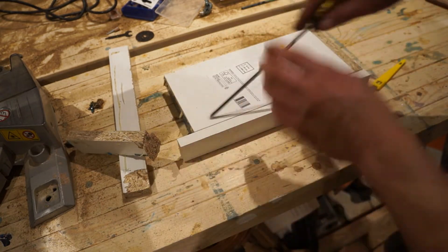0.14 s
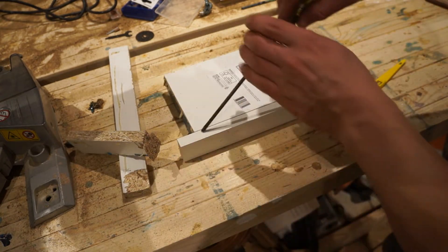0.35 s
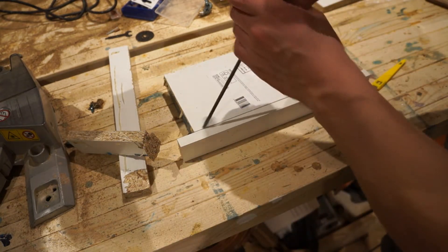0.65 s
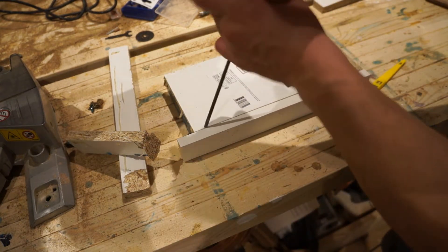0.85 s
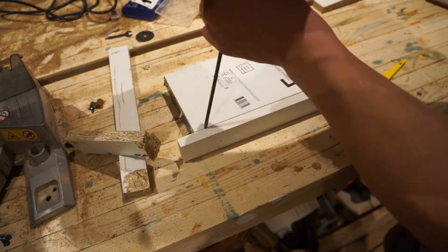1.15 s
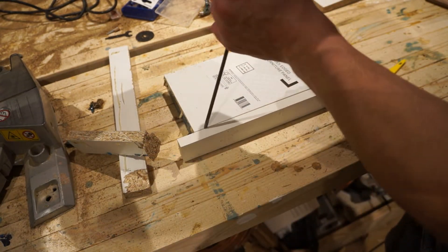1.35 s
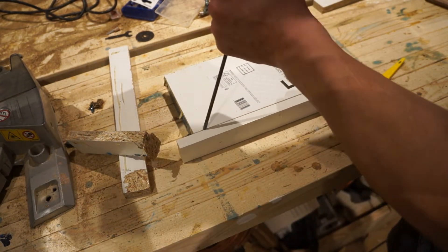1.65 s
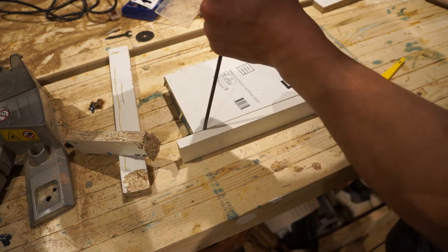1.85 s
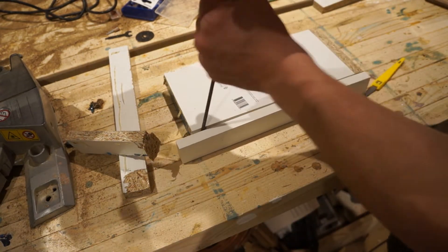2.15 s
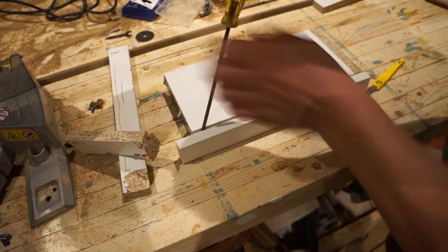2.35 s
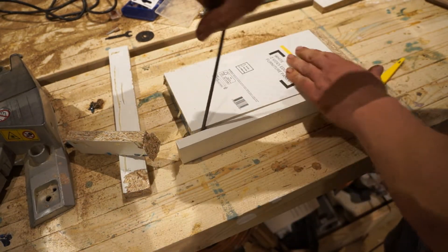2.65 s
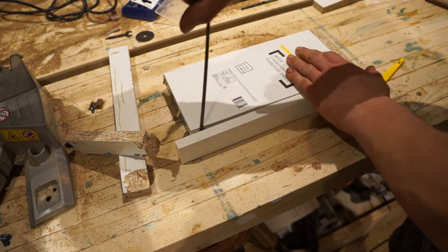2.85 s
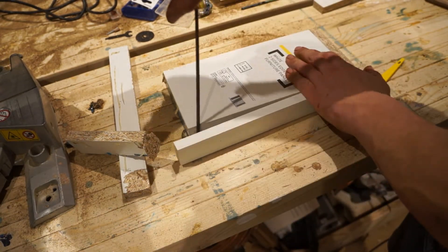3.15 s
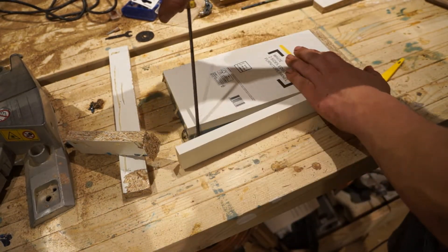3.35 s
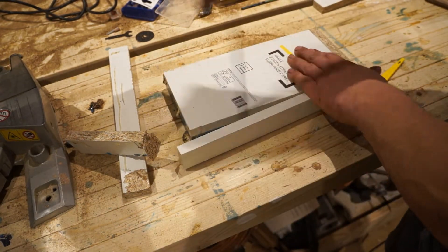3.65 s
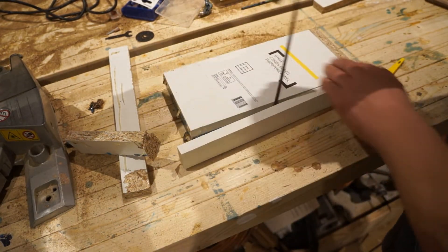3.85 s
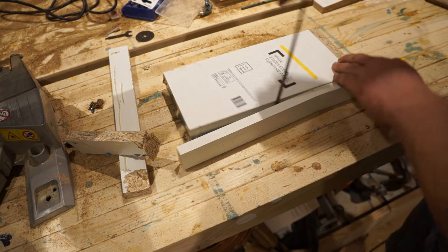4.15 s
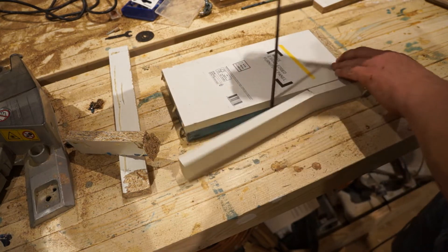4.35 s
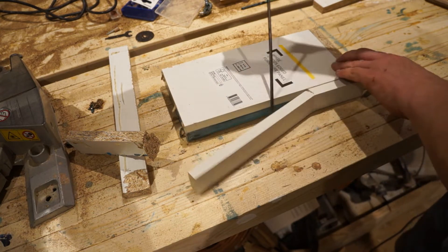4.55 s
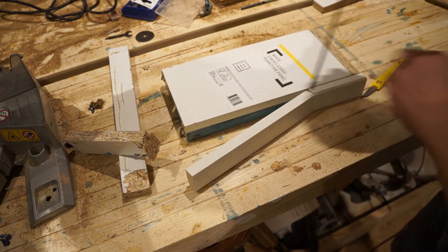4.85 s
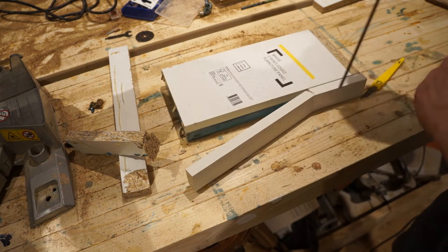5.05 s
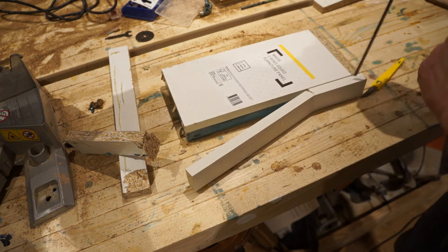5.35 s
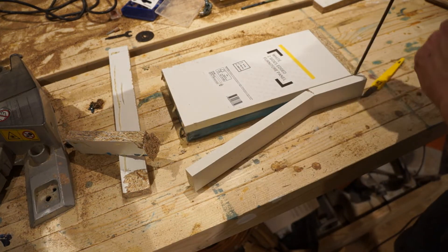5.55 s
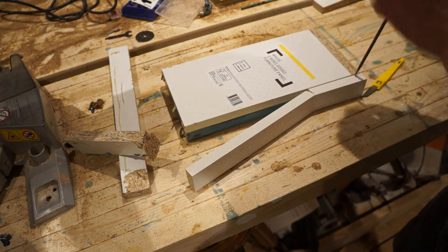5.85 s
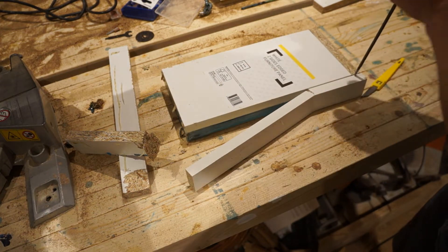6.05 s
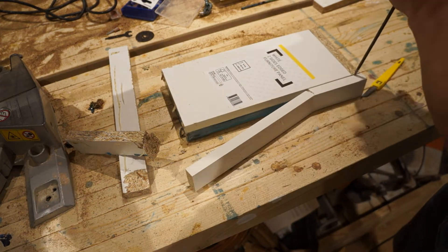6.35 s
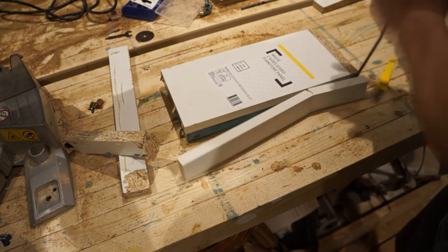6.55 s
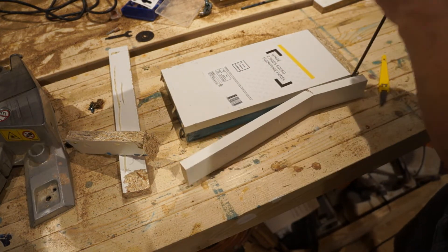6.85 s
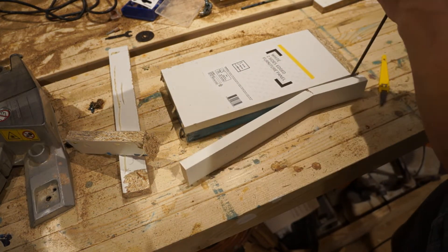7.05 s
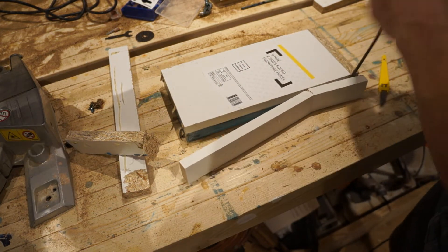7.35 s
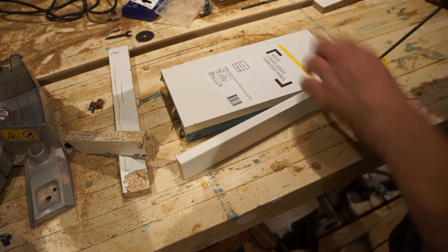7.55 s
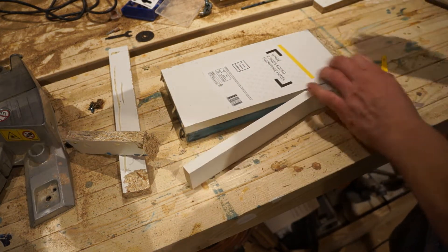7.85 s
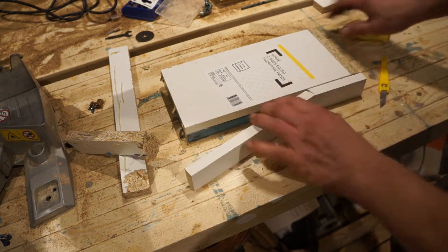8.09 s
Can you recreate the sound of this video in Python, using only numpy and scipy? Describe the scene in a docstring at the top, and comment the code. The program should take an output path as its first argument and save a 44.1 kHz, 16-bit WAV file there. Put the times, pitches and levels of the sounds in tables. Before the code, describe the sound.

Chipboard panels are pried off a block on a wooden bench: woody knocks, sharp joint cracks, heavy bangs, scraping, then a clattering landing.

```python
"""A thin steel rod pries chipboard panels off a cast block on a wooden bench in a small workshop.
Cracks, knocks and a few heavy blows combine noise bursts with dying modes of bench, board and rod.
Hands and panels rub in between as filtered noise; squeaks, creaks and landing panels add their tones.
Noise tails give the room its echo over a steady hush, and a camera close by holds the heavy blows
down with a limiter and a slow gain control."""
import sys
import numpy as np
from scipy import signal
from scipy.fft import rfft, irfft
from scipy.io import wavfile
from scipy.ndimage import uniform_filter1d, minimum_filter1d

SR = 44100
rng = np.random.default_rng(int(sys.argv[2]) if len(sys.argv) > 2 else 0)


def nominal_scale(level):
    """Amplitude ratio for a level in decibels (scalar or array-like)."""
    x = np.asarray(level, float) / 20
    return 10 ** x


def transcribe(u):
    """Save the signal u as a 16-bit wav file named by the first command-line argument.

    u: samples, shape (n,) or (channels, n), limited to [-1, 1]; the rate is SR.
    q: integer samples, one column per channel.
    """
    v = np.clip(np.atleast_2d(u).T, -1, 1)
    q = np.round(v * 32767).astype(np.int16)
    wavfile.write(sys.argv[1], SR, q)


N = 362502  # length of the scene in samples

# All event levels stand ahead of the echo and the gain control.
# Steady background spectrum. Each row: frequency in Hz, relative density in dB per Hz.
HUSH_SPECTRUM = [(15, -57), (25, 11), (163, 3.5), (252, 3.5), (466, -2), (739, -6), (1030, -8.5),
                 (1550, -9.5), (1860, -16), (10400, -21.5), (11500, -35), (15000, -75), (22000, -120)]
# Stereo background. Each row: frequency in Hz, left-right likeness from 0 to 1.
HUSH_LIKENESS = [(60, 1), (350, 0.6), (2010, 0.13), (11600, 0.93)]
# Decay of the room. Each row: frequency in Hz, t60 in seconds.
ROOM_T60 = [(100, 0.6), (260, 0.37), (700, 0.45), (1840, 0.41), (4850, 0.36), (11000, 0.21)]
# Stereo echo. Each row: frequency in Hz, left-right likeness from 0 to 1.
ROOM_LIKENESS = [(100, 1), (500, 0.9), (1500, 0.72), (5000, 0.64), (11000, 0.71)]
# Colour of the bench rumble. Each row: frequency in Hz, relative level in dB.
RUMBLE_COLOUR = [(10, 2.5), (25, -3.5), (45, -10), (110, -15.5), (250, -37.5)]

# Modes of the bench. Each row: frequency in Hz, relative level in dB, free t60 in seconds.
BENCH_MODES = [(125, -4.5, 0.1), (187.2, -0.5, 0.15), (228, -11.5, 0.1), (259, -1, 0.15), (309.6, -5, 0.16),
               (341, -9, 0.26), (389.4, 7.5, 0.11), (424, 6.5, 0.06), (480.7, 5, 0.13), (543, -3, 0.073),
               (597, -1, 0.078)]
# Modes of the rod. Each row: frequency in Hz, relative level in dB, free t60 in seconds.
ROD_MODES = [(1646, -5, 0.056), (1832, 6.5, 0.013), (2076, 10, 0.018), (2214, 3, 0.043), (2455, 2, 0.022),
             (2717, -0.5, 0.048), (2944, 2, 0.028), (3380, 2.5, 0.014), (3860, 2, 0.027), (5010, -1, 0.029),
             (6820, -4.5, 0.032)]
# Modes of a board. Each row: multiple of its pitch, relative level in dB, free t60 in seconds.
BOARD_MODES = [(0.858, -42, 0.049), (1, 12.5, 0.037), (1.07, -18, 0.049), (1.236, -16.5, 0.14)]
# Modes of a loose panel. Each row: frequency in Hz, relative level in dB, t60 in seconds.
LOOSE_MODES = [(483.5, 4, 0.12), (490, -21, 0.045), (843, -16, 0.098), (981, -5, 0.068),
               (1180, -3.5, 0.056), (1520, -18, .05), (1957, -4.5, 0.052), (2140, -12, 0.046)]
# Colour of a crack. Each row: frequency in Hz, relative level in dB.
CRACK_COLOUR = [(150, -48), (500, -7), (1000, 7), (2400, 10), (5000, 9), (8000, 4), (11000, -1)]
# Colour of the dense chipboard modes. Each row: frequency in Hz, relative level in dB.
CLACK_COLOUR = [(200, -6), (450, -0.5), (1200, 6.5), (2300, -5), (4000, -15.5), (9000, -31.5)]

# Rubbing. Each row is a stretch: panel against the drag in dB, extra top of the grit in dB, and a
# curve whose points hold: time in seconds, drag level in dB, grit level in dB.
RUB_STRETCHES = [ (-8, -9.5, [(0.0, -44, -51.5), (0.158, -51, -50.5), (0.45, -54.5, -55.5),
                 (0.7, -55, -55.5)]), (-12.5, 5, [(0.75, -56, -57.5), (1.086, -61.5, -60.5),
                 (1.274, -58, -63.5), (1.5, -78, -66.5)]), (4.5, -3.5, [(2.37, -72.5, -105),
                 (2.6, -66.5, -64), (2.75, -51.5, -53.5), (2.91, -72, -63)]), (0, -2, [(2.95, -68, -52),
                 (3.04, -45, -34), (3.15, -44, -32), (3.33, -51, -50), (3.43, -55, -53.5),
                 (3.6, -46, -52.5), (3.83, -58, -54), (3.92, -48.5, -46.5), (3.99, -56, -62)]),
                 (1, -1, [(4.03, -64, -60), (4.2, -54.5, -53.5), (4.38, -39.5, -32), (4.45, -56, -37),
                 (4.65, -54, -56), (4.8, -69, -55)]), (-2, -2.5, [(4.85, -79, -58.5), (5.0, -55, -64),
                 (5.4, -71, -68), (5.6, -52.5, -64.5), (5.97, -62.5, -59), (6.3, -66.5, -65),
                 (6.52, -56.5, -69)]), (-0.5, -10, [(6.9, -60, -67.5), (7.248, -69, -79),
                 (7.42, -52.5, -56.5), (7.732, -57, -55), (7.912, -55, -55.5), (8.02, -54.5, -78)]), ]
# Resonances of a rubbed panel. Each row: frequency in Hz, bandwidth in Hz, relative level in dB.
PANEL_RESONANCES = [(997, 92, -10), (1316, 210, 0), (1640, 500, -12)]
# Colour of the grit hiss. Each row: frequency in Hz, relative level in dB.
GRIT_COLOUR = [(1500, -10), (2300, 3.5), (3000, 1.5), (4000, 0), (4900, 0), (5900, -3), (7000, -1.5),
               (9000, 0.5), (11000, 0.5)]

# Panel and rod sliding on the block.
# Each row: start in seconds, length in seconds, level in dB, frequency in Hz, bandwidth in Hz.
SQUEAKS = [(2.547, 0.11, -55.5, 1392, 60), (2.54, 0.34, -57, 2023, 500), (3.598, 0.082, -51, 2300, 300),
           (3.728, 0.039, -45.5, 5170, 300), (3.88, 0.12, -48, 2380, 300), (3.886, 0.1, -57, 5250, 250),
           (3.882, 0.099, -61, 7000, 300), (4.76, 0.079, -46, 1340, 90), (4.762, 0.041, -41, 1892, 400),
           (5.495, 0.57, -58, 1382, 45), (7.38, 0.11, -64, 4840, 350), (7.573, 0.071, -43.5, 4900, 450)]
# Stick-slip creaks. Each row: start in seconds, peak in dB, frequency in Hz, length in seconds.
STICK_SLIPS = [(2.87, -47.5, 493, 0.06), (4.606, -41, 1786, 0.029), (4.635, -36, 482, 0.034),
               (4.675, -41, 479, 0.018), (4.71, -40.5, 460, 0.021), (4.79, -40.5, 542, 0.052),
               (5.116, -41, 370, 0.045), (5.172, -41.5, 386, 0.038)]
# Crowded small snaps of a splitting joint.
# Each row: start in seconds, length in seconds, level at the start in dB.
SPLIT_JOINTS = [(3.02, 0.2, -34), (4.22, 0.29, -45)]
# The rod clear of the wood. Each row: start in seconds, level in dB, frequency in Hz, t60 in seconds.
FREE_ROD = [(0.5018, -34.5, 2183, 0.027), (1.4885, -50, 2900, .007), (1.49, -55, 1800, .03),
            (1.5062, -45, 3620, .006), (2.7547, -41, 2850, 0.056), (3.036, -34, 2130, 0.09),
            (3.63, -46, 2935, 0.1), (3.7334, -43.5, 2886, 0.054), (4.141, -48.5, 2320, 0.01),
            (7.6, -40, 1775, 0.12), (7.605, -36.5, 2245, 0.14), (7.62, -49, 2900, .08),
            (7.62, -48, 3470, .1), (7.62, -39, 2495, 0.17), (7.815, -53, 2960, 0.056),
            (7.855, -53, 2280, 0.09)]
# A loose panel lands on the bench. Each row: start in seconds, level in dB.
LANDINGS = [(8.0183, -19), (8.096, -12), (8.17, -14.5)]
# Short scrapes. Each row: start in seconds, then in dB, ahead of the smearing: crack peak, board, bench.
SHORT_SCRAPES = [(0.488, -30, -37, -46), (0.78, -45.5, -61, -59), (2.62, -42.5, -74, -52),
                 (5.022, -58, -51, -43.5), (3.99, -54, -50, -35.5), (5.474, -39, -35, -42),
                 (7.577, -33.5, -34.5, -63), (7.588, -36, -28.5, -53), (7.597, -34, -34, -68),
                 (7.611, -27, -30.5, -45.5), (7.64, -39, -33, -46), (7.688, -43, -45, -70),
                 (7.811, -39.5, -45.5, -48.5)]
# The rod or a hand knocks a board.
# Each row: start in seconds, board level in dB, board pitch in Hz, bench level in dB, crack peak in dB.
BOARD_KNOCKS = [(0.1791, -24.5, 953, -39.5, -23), (0.2181, -22, 934, -33, -20.5),
                (0.3022, -23, 940, -35, -31.5), (0.5017, -22.5, 972, -37, -23.5),
                (0.6953, -39.5, 920, -48, -50.5), (3.2129, -42.5, 990, -42, -21),
                (3.6269, -45.5, 994, -38, -26), (3.733, -40.5, 963, -45, -23),
                (3.789, -46, 1120, -47, -32.5), (3.9633, -44, 1070, -27.5, -40),
                (4.1368, -49, 857, -43, -53), (4.765, -36.5, 943, -51, -27.5),
                (5.4221, -31, 1047, -27, -33), (6.208, -37, 1063, -34, -37.5),
                (6.8826, -44, 1010, -55, -50), (8.018, -26, 1021, -30.5, -37),
                (8.0961, -9.5, 960, -22.5, -7.5)]
# The joint of panel and block cracks open. Each row: start in seconds, crack peak in dB, bench in dB.
JOINT_CRACKS = [(1.1103, -41.5, -58), (1.486, -33, -67), (1.506, -32, -59), (1.525, 3, -24),
                (1.9762, 5, -28), (2.7287, -28, -74), (2.755, -17.5, -60), (2.923, -41, -52),
                (2.9314, -35, -58), (2.9632, -21, -62), (2.9838, -30, -50), (2.9995, -30, -53),
                (3.0133, -16, -42.5), (3.036, -7, -30), (3.0574, -11.5, -41.5), (3.0778, -14, -42),
                (3.1022, -4, -39), (3.149, -17, -49), (3.2342, -25, -48), (3.3169, -24, -53),
                (3.3392, -20.5, -48.5), (3.4385, -32, -45), (3.4962, -27, -54), (4.2108, -21.5, -45),
                (4.2329, -17.5, -61), (4.2727, -24, -60), (4.2769, -15.5, -60), (4.286, -16.5, -52),
                (4.3168, -27, -66), (4.3456, -15.5, -43), (4.354, -18.5, -46), (4.365, -25, -38),
                (4.393, -24, -40.5), (4.435, -14, -44), (4.4432, -26, -53), (4.5162, -17.5, -64),
                (5.8392, -29, -47), (6.5325, 6.5, -32), (6.5375, 0.5, -30), (7.0554, -42.5, -69),
                (8.108, -5, -28)]
# Heavy blows. Each row: start in seconds, levels of the separate parts in dB (crack peak, bench, board),
# tilt of the bench modes in dB per octave, shake of the bench in dB.
HEAVY_BLOWS = [(1.519, -2, -2, -19.5, -5, -21), (1.971, 10.5, -2, -3, -3.5, -17.5),
               (6.526, 5.5, -3.5, -2, 2, -21), (8.103, 2, -11.5, -7.5, 20, -43)]


def evened(x):
    """Normalisation: scales a signal to rms 1."""
    return x / np.sqrt(np.mean(x ** 2) + 1e-20)


def read(points, hz):
    """Interpolates a response table linearly along a log-frequency axis."""
    f, value = np.transpose(points)
    return np.interp(np.log(hz + 1), np.log(f + 1), value)


def coloured(x, points):
    """Linear filtering: weights the spectrum by a response in dB."""
    gain = nominal_scale(read(points, np.fft.rfftfreq(len(x), 1 / SR)))
    return irfft(rfft(x) * gain, len(x))


def add(mix, s, sound):
    """Superposition: adds a sound to the mix from second s."""
    part = mix[round(s * SR):][:len(sound)]
    part += sound[:len(part)]


def noise_pair(gain, same):
    """Partly coherent stereo noise: a shared and an opposed field, shaped over frequency and time."""
    hz, t = np.fft.rfftfreq(512, 1 / SR)[:, None], np.arange(N // 128 + 5) * 128 / SR
    a, b, c, d = rng.standard_normal((len(t), len(hz), 4)).T
    like = np.clip(read(same, hz), 0, 1)
    shared = (a + 1j * b) * np.sqrt(1 + like)
    apart = (c + 1j * d) * np.sqrt(1 - like)
    z = np.array([shared + apart, shared - apart]) * gain(hz, t)
    return signal.istft(z, nperseg=512, noverlap=384)[1][:, :N]


def burst(size, rise_s, points, even):
    """A noise impulse; even = 1 flattens its chance spectrum before colouring, 0 leaves it lumpy."""
    t = np.arange(size) / SR
    z = rfft(rng.standard_normal(size) * (t / rise_s) ** 2 * np.exp(-t / rise_s))
    colour = nominal_scale(read(points, np.fft.rfftfreq(size, 1 / SR)))
    z *= colour / (abs(z) + 1e-9) ** np.clip(even, 0, 1)
    return irfft(z, size) * signal.windows.tukey(size, .02)


def ring(modes, spread_db, rise_s, size=8000):
    """Modal decay: dying sines, excited unequally by chance; rms 1 over the first 20 ms."""
    t = np.arange(size) / SR
    hz, db, t60 = np.transpose(modes)[:, :, None]
    luck_db = spread_db * rng.standard_normal(db.shape)
    side = (-1.) ** np.arange(len(db))[:, None]  # neighbours of opposite sign fill the gaps between them
    rise = (1 - np.exp(-t / rise_s)) ** 2  # the contact builds up
    level = nominal_scale(db + luck_db - 60 * t / t60)
    x = rise * (side * level * np.sin(2 * np.pi * hz * t)).sum(0)
    return x / np.sqrt(np.mean(x[:SR // 50] ** 2))


def clack(hold, size=8000):
    """High modal density: chipboard modes too close to tell apart act as fast-dying coloured noise."""
    t60 = 0.079 * hold
    t = np.arange(size) / SR
    x = coloured(rng.standard_normal(size), CLACK_COLOUR)
    x = x * (1 - np.exp(-t / 0.00098)) * nominal_scale(-60 * t / t60)
    return x / np.sqrt(np.mean(x[:SR // 50] ** 2))


def hush():
    """Stationary noise: the steady air of the workshop and the hiss of the microphone."""
    noise = noise_pair(lambda hz, t: nominal_scale(read(HUSH_SPECTRUM, hz)), HUSH_LIKENESS)
    return nominal_scale(-56.5) * evened(noise)


def rooms(count=4):
    """Reverberation: noise tails for several places on the bench decay at a rate set by frequency."""
    size = 30000
    noise = noise_pair(lambda hz, t: 1, ROOM_LIKENESS)[:, :count * size].reshape(2, count, size)
    hz, t, z = signal.stft(noise, SR, nperseg=256)
    decay = nominal_scale(-60 * t / read(ROOM_T60, hz)[:, None])
    tails = signal.istft(z * decay, SR, nperseg=256)[1][..., :size]
    tails = tails * np.clip((np.arange(size) / SR - .002) / 0.0015, 0, 1)  # walls answer after a few ms
    return tails / np.linalg.norm(tails[0], axis=-1)[:, None]  # energy 1 on the left


def shake():
    """Structural vibration: after a heavy blow the bench rumbles as low noise that dies exponentially."""
    t60 = 0.53  # s
    t, level = np.arange(N) / SR, np.zeros(N)
    for s, *_, db in HEAVY_BLOWS:
        rise = np.clip((t - s) / .012, 0, 1) ** 2
        level += rise * nominal_scale(db - 60 * np.maximum(t - s, 0) / t60)
    shared, apart = (coloured(x, RUMBLE_COLOUR) for x in rng.standard_normal((2, N)))
    return level * evened(np.array([shared + 0.098 * apart, shared - 0.17 * apart]))


def rubbing():
    """Friction: dense uneven grains excite bench and panel resonances and a fine grit hiss."""
    rows = [(s, drag, drag + panel, grit, top)
            for panel, top, curve in RUB_STRETCHES for s, drag, grit in curve]
    s, *columns = np.transpose(rows)
    bench_db, panel_db, grit_db, fine_db = (np.interp(np.arange(N) / SR, s, c) for c in columns)

    # grain level changes by chance every 64 samples
    size_db = np.array([[2.35], [2.35], [4.0]]) * np.minimum(rng.exponential(1, (3, N // 64 + 1)), 3)
    grains = rng.standard_normal((3, N)) * nominal_scale(size_db.repeat(64, axis=1)[:, :N])

    t = np.arange(4000) / SR
    panel = sum(nominal_scale(db) * width * np.exp(-np.pi * width * t) * np.sin(2 * np.pi * hz * t)
                for hz, width, db in PANEL_RESONANCES)
    drag = signal.oaconvolve(grains[0], ring(BENCH_MODES, spread_db=1.0, rise_s=0.00053))[:N]
    slide = signal.oaconvolve(grains[1], panel)[:N]
    grit = evened(coloured(grains[2], [(700, -50), *GRIT_COLOUR]))
    fine = coloured(grit, [(5000, -28), (8000, -0.5)])
    grit = grit + (nominal_scale(fine_db) - 1) * fine  # dry skin and dust change only the top
    return nominal_scale(bench_db) * evened(drag) + nominal_scale(panel_db) * evened(slide) + nominal_scale(grit_db) * grit


def squeak(length, db, hz, width_hz):
    """Narrow-band friction noise: slow complex noise modulates a tone into a fuzzy whistle."""
    t = np.arange(0, length, 1 / SR)
    r = np.exp(-np.pi * width_hz / SR)
    noise = rng.standard_normal((len(t), 2)).T
    a, b = signal.lfilter([(1 - r) ** 2], np.poly([r, r]), noise)
    turn = 2 * np.pi * hz * t
    whistle = evened(a * np.cos(turn) + b * np.sin(turn))
    return nominal_scale(db) * whistle * np.sin(np.pi * (t / length) ** 0.64)


def creak(db, hz, length):
    """Stick-slip: one mode sings briefly, here a sine that swells and fades."""
    t = np.arange(0, length, 1 / SR)
    return nominal_scale(db) * np.sin(2 * np.pi * hz * t) * np.hanning(len(t))


def snaps():
    """Random impulses: fibres let go, a few loudly; each split starts at once and falls by 12 dB."""
    snaps_per_s = 160
    t = np.arange(N) / SR
    clicks = (rng.random(N) < snaps_per_s / SR) * nominal_scale(4.5 * np.minimum(rng.exponential(1, N), 3))
    kind = rng.integers(0, 8, N)  # eight different bursts
    train = sum(signal.oaconvolve(clicks * (kind == k), burst(256, 0.00059, CRACK_COLOUR, 0.2))[:N]
                for k in range(8))
    level = sum((t > s) * (t < s + length) * nominal_scale(db - 12 * (t - s).clip(0, 1) / length)
                for s, length, db in SPLIT_JOINTS)
    return level * evened(train)


def free_rod(db, hz, t60):
    """Light damping: clear of the wood, the rod rings on in a close pair of tones."""
    pair = [(hz, 0, t60), (hz * 1.02, -7, t60)]
    return nominal_scale(db) * ring(pair, spread_db=1, rise_s=0.001)


def landing(db):
    """Impact of a loose panel: its separate modes ring over the dense chipboard clack."""
    return nominal_scale(db) * (ring(LOOSE_MODES, spread_db=6.5, rise_s=0.00074) + nominal_scale(-8) * clack(hold=0.86))


def parts(crack_db, bench_db, board_db, rod_db, board_hz, tilt_db=0, hold=1, even=0.078, luck=1):
    """Impact excitation: a short crack sets bench, board and rod ringing; hold under 1 damps them."""
    bench = [(hz, db + tilt_db * np.log2(hz / 300), t60 * hold) for hz, db, t60 in BENCH_MODES]
    board = [(k * board_hz, db, t60 * hold) for k, db, t60 in BOARD_MODES]
    rod = [(hz, db, t60 * hold) for hz, db, t60 in ROD_MODES]
    low = nominal_scale(bench_db) * ring(bench, spread_db=3.8 * luck, rise_s=0.00019)
    middle = nominal_scale(board_db) * ring(board, spread_db=3 * luck, rise_s=0.0025)
    high = nominal_scale(rod_db) * ring(rod[:-3], spread_db=3 * luck, rise_s=0.0001)
    # the top three rod modes follow the crack
    top = nominal_scale(crack_db - 26.5) * ring(rod[-3:], spread_db=3 * luck, rise_s=0.0001)
    body = nominal_scale((bench_db + board_db) / 2 - 10.5) * clack(hold)
    puff = burst(512, 0.00038, CRACK_COLOUR, even)
    crack = np.pad(nominal_scale(crack_db) * puff / abs(puff).max(), (0, len(low) - len(puff)))
    highpass = signal.butter(2, 95, "high", fs=SR, output="sos")
    return signal.sosfilt(highpass, [crack, low, middle, high, top, body])


def hit(*levels, hold=1):
    """Superposition at a single contact: all parts start together."""
    return parts(*levels, hold=hold).sum(0)


def smeared(sound, rise_s):
    """Convolution with a noise burst spreads a hit in time, like a quick train of contacts."""
    rattle = burst(2048, rise_s, [(20, 0), (20000, 0.0075)], 0.66)
    return signal.fftconvolve(sound, rattle / np.linalg.norm(rattle))


def scrape(crack, board, bench):
    """Repeated contact: a hit smeared over a few milliseconds has a softer start."""
    return smeared(hit(crack, bench, board, crack - 12.5, 1007), rise_s=0.0029)


def knock(board, hz, bench, crack):
    """Free impact: the struck board rings at its own pitch, the rod 14 dB under the crack."""
    return hit(crack, bench, board, crack - 14, hz)


def joint_crack(crack, bench):
    """Sudden release: the joint opens with a sharp crack, and boards held in place ring short."""
    return hit(crack, bench, crack - 35.5, crack - 17, 934, hold=0.54)


def blow(crack, bench, board, tilt_db):
    """Damped incoherent impact: pressed parts ring short, and their powers add up to a dense bang."""
    levels = (crack, bench, board, (crack + board) / 2 - 10.5, 1000)
    struck = parts(*levels, tilt_db=tilt_db, hold=0.21, even=1.0, luck=0.1)
    power = (abs(rfft(struck)) ** 2).sum(0)
    treble = np.clip(np.fft.rfftfreq(8000, 1 / SR) / 1300 - 1, 0, 1)  # the high modes melt together
    narrow = uniform_filter1d(power, size=25)
    wide = uniform_filter1d(power, size=161)
    blurred = np.sqrt(abs((1 - treble) * narrow + treble * wide))
    rattle = rfft(burst(2048, 0.00234, [(20, 0), (20000, 0)], 0.92), 8000)
    bang = irfft(blurred * rattle / np.sqrt(np.mean(abs(rattle) ** 2)))
    bang = np.roll(bang, shift=60)[:4000]
    rise_s = 0.0059  # the parts give a little first
    bang = bang * (1 - np.exp(-(np.arange(len(bang)) / SR / rise_s) ** 2))
    highpass = signal.butter(2, 150, "high", fs=SR, output="sos")  # the bench radiates little bass
    return signal.sosfilt(highpass, bang)


def scene():
    """Direct and reverberant fields: events, rubbing and snaps also sound through the echo tails."""
    sounds = [(s, blow(*levels, tilt_db)) for s, *levels, tilt_db, _ in HEAVY_BLOWS]
    sounds += [(s, knock(*row)) for s, *row in BOARD_KNOCKS]
    sounds += [(s, joint_crack(*row)) for s, *row in JOINT_CRACKS]
    sounds += [(s, scrape(*row)) for s, *row in SHORT_SCRAPES]
    sounds += [(s, creak(*row)) for s, *row in STICK_SLIPS]
    sounds += [(s, squeak(*row)) for s, *row in SQUEAKS]
    sounds += [(s, free_rod(*row)) for s, *row in FREE_ROD]
    sounds += [(s, landing(db)) for s, db in LANDINGS]
    tails = rooms()
    places = np.zeros((tails.shape[1], N))
    for k, (s, sound) in enumerate(sounds):
        add(places[k % len(places)], s, sound)
    places[0] += rubbing()
    places[1] += snaps()
    wet = signal.fftconvolve(places[None], tails, axes=-1)[..., :N].sum(1)
    return places.sum(0) + nominal_scale(-3) * wet + shake() + hush()


def low_pass(x):
    """Removes everything above the highest recorded frequency."""
    return signal.sosfilt(signal.butter(12, 12210, fs=SR, output="sos"), x)


def record(dry):
    """Dynamic range control: a fast limiter looks ahead, a slow gain lags; then the band is limited."""
    peak_db = 20 * np.log10(abs(dry).max(0) + 1e-9)
    fall = np.arange(N) * 560.0 / SR  # the held peak falls by 560 dB a second
    over_db = np.maximum(np.maximum.accumulate(peak_db + fall) - fall + 8.0, 0)  # excess over -8 dB
    over_db = uniform_filter1d(-minimum_filter1d(-over_db, size=201), size=201)
    lag = np.exp(-1 / (.25 * SR))  # two lags: the gain sinks deepest some time after a blow
    slow_db = signal.lfilter([(1 - lag) ** 2], np.poly([lag, lag]), 0.94 * over_db)
    held = dry * nominal_scale(-1.2 * over_db - slow_db)  # pulls harder than the excess, so a heavy blow swells as it dies
    lowpass = signal.firwin(301, 11150, window=("kaiser", 5), fs=SR)
    mix = signal.oaconvolve(held, lowpass[None], "same")
    return low_pass(mix)


dry = scene()
out = record(dry)
transcribe(out)
```